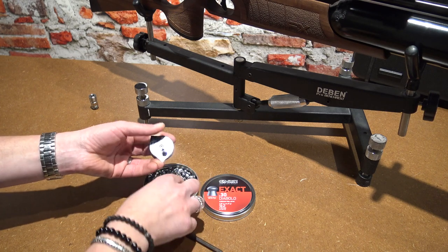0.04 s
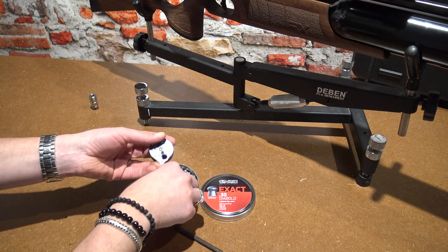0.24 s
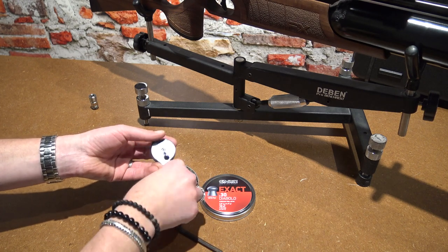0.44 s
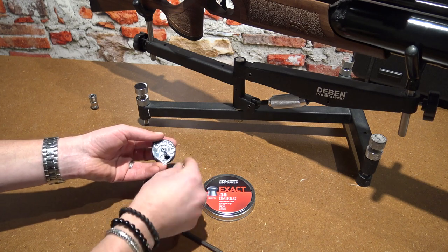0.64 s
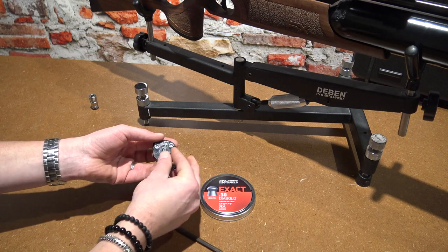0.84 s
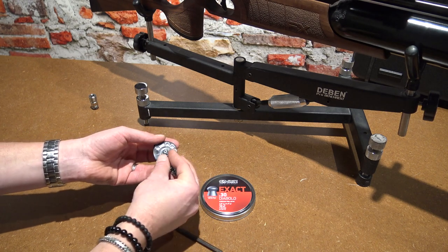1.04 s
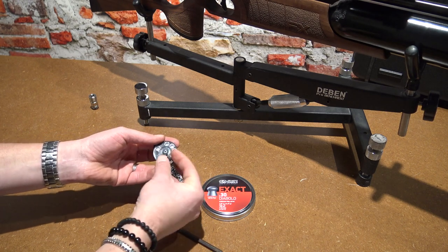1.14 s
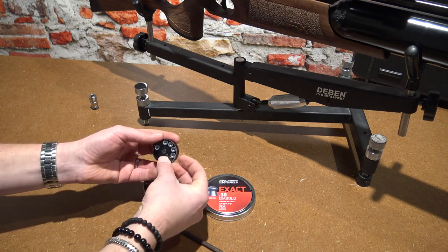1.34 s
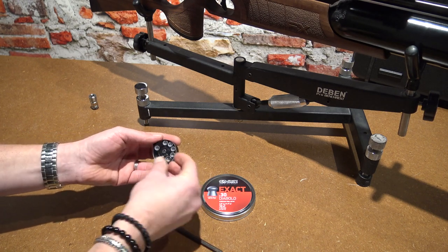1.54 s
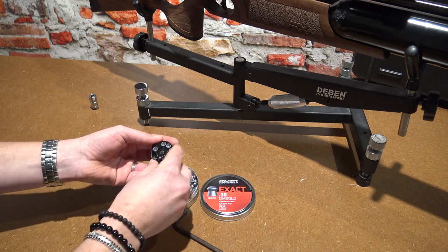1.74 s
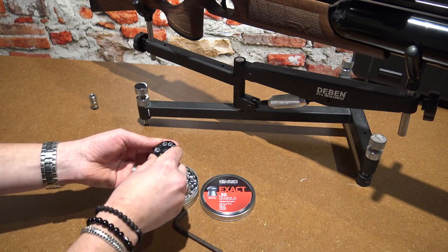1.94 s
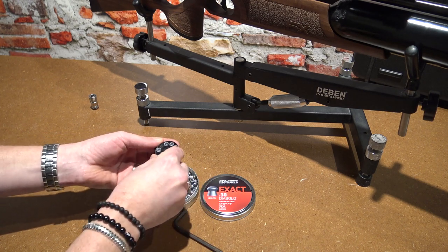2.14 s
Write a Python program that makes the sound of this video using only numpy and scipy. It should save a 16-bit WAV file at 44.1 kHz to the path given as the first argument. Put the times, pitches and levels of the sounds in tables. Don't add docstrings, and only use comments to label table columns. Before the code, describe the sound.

Small lead pellets are stirred in a thin tin, a few dropping back with bright ringing bounces, then pressed into a magazine with short clicks and faint rubs; quiet room, faint hum, close microphone.

```python
import sys
import numpy as np
from scipy import signal
from scipy.fft import rfft, irfft
from scipy.io import wavfile
from scipy.ndimage import uniform_filter1d

SR = 44100
rng = np.random.default_rng(int(sys.argv[2]) if len(sys.argv) > 2 else 0)


def gain_from_db(level_db):
    decades = np.asarray(level_db, float) / 20
    return 10 ** decades


def transcribe(u):
    v = np.clip(np.atleast_2d(u).T, -1, 1)
    q = np.round(v * 32767).astype(np.int16)
    wavfile.write(sys.argv[1], SR, q)


N = 97020


def read(points, hz):
    f, value = np.transpose(points)
    return np.interp(np.log(hz + 1), np.log(f + 1), value)


def evened(x):
    return x / np.sqrt(np.mean(x ** 2) + 1e-20)


def peaked(x):
    return x / abs(x).max()


def add(mix, s, sound):
    part = mix[max(round(s * SR), 0):][:len(sound)]
    part += sound[:len(part)]


def coloured(x, points):
    gain = gain_from_db(read(points, np.fft.rfftfreq(len(x), 1 / SR)))
    return evened(irfft(rfft(x) * gain, len(x)))


def ring(hz, db, t60, size=2000):
    t = np.arange(size) / SR
    return gain_from_db(db - 60 * t / t60) * np.sin(2 * np.pi * hz * t)


MODE_SPREAD_DB, MODE_DETUNE = 2.5, 0.02


def modes(table, draw):
    total = 0
    for (hz, db, t60), (detune, spread, sign) in zip(table, draw):
        total = total + np.sign(sign) * ring(hz * (1 + MODE_DETUNE * detune), db + MODE_SPREAD_DB * spread, t60)
    return total


def burst(noise, band_hz, db, t60):
    band = signal.butter(2, band_hz, "band", fs=SR, output="sos")
    puff = evened(signal.sosfilt(band, noise))
    return gain_from_db(db - 60 * np.arange(len(noise)) / SR / t60) * puff


def tail(t60, points):
    hz, t, z = signal.stft(coloured(rng.standard_normal(SR), points), SR, nperseg=256)
    out = signal.istft(z * gain_from_db(-60 * t / read(t60, hz)[:, None]), SR, nperseg=256)[1]
    rise_s = 0.00076
    out = out * np.minimum(np.arange(len(out)) / (rise_s * SR), 1)
    return out / np.linalg.norm(out)


# (time [s], knock level [dB], knock pitch [Hz], tick level re knock [dB])
STIRS = [(.0905, -28.5, 1830, -7), (.0954, -27, 2770, -14), (.1037, -28.5, 2660, -6.5),
         (.1134, -47, 3430, -6.5), (.1194, -31, 1810, -17), (.199, -20.5, 3000, -8),
         (.2076, -19.5, 1510, -8), (.2098, -17.5, 1520, -19), (.2135, -25, 1500, -11),
         (.2172, -20.5, 3200, -4.5), (.2226, -17, 2600, -9), (.2245, -20, 2900, -4),
         (.2268, -22, 2600, -16), (.2313, -16.5, 2200, -10), (.2384, -21, 2510, -23),
         (.2484, -36, 2500, -23), (.2522, -21.5, 2240, -8), (.2535, -12.5, 2150, -10),
         (.259, -18, 1850, -18), (.27, -31, 2360, -10), (.275, -19, 2140, -22), (.2778, -8, 2950, -3.5),
         (.2792, -12.5, 2780, -2), (.2835, -18, 1700, -4), (.2884, -14, 1890, -17), (.2959, -13, 2200, -16),
         (.313, -22, 1500, -15), (.3218, -12, 2276, -13), (.3245, -18, 2930, -16),
         (.3364, -13.5, 2810, -21), (.344, -31, 2300, -13), (.3584, -22, 2750, -18)]
# (time [s], knock level [dB], knock pitch [Hz], tick level re knock [dB])
DROPS = [(.3861, -1.5, 2800, -17), (.3885, -8, 3300, -20), (.4077, -6, 3450, -10), (.4097, -9, 2300, -14),
         (.4178, -11, 3450, -20), (.4305, -14, 3500, -22), (.4526, -2, 3130, -18), (.4585, -13, 3600, -22),
         (.4743, -16, 3470, -24), (.4873, -5, 3120, -19), (.4897, -11, 3000, -19), (.497, -9, 3200, -12),
         (.5158, -10, 3160, -23), (.5339, -11, 3140, -21), (.5479, -15, 3170, -25), (.5586, -19, 2900, -30),
         (.574, -21, 3200, -32), (.601, -25, 3100, -35)]
# (frequency [Hz], level re knock [dB], t60 [s])
TIN_FLOOR = [(950, -8, 0.0039), (1550, -11, 0.033), (2200, -0.5, 0.0065), (3000, -6, 0.02),
             (3600, -14, 0.0089), (4540, -28, 0.012)]
# (frequency [Hz], level re knock [dB], t60 [s])
LANDING_FLOOR = [(960, -16, 0.0074), (1500, -13.5, 0.021), (2250, -6.5, 0.0068), (2767, -4, 0.0098),
                 (3522, -8.5, 0.016), (4380, -13, 0.0052)]
# (frequency [Hz], level [dB], t60 [s])
TABLE_TOP = [(224, 5, 0.022), (472, 6, 0.025), (674, -2, 0.041)]
TIN_RISE_S = 0.0002
KNOCK_DB, KNOCK_T60_S = -0.5, 0.013
STRIKE_DB, STRIKE_T60_S = 2.5, 0.0018
SHIVER_BAND_HZ, SHIVER_DB, SHIVER_T60_S = (1230, 3730), -12.5, 0.035
TICK_HZ, TICK_BAND_HZ, TICK_T60_S = 8460, (6000, 15500), 0.011


def tin(table, floor, table_db):
    out, t = np.zeros(N), np.arange(2000) / SR
    rise = 1 - np.exp(-t / TIN_RISE_S)
    for s, db, hz, tick_db in table:
        draw = rng.standard_normal((len(floor), 3))
        noise = rng.standard_normal(2000)
        knock = ring(hz, KNOCK_DB, KNOCK_T60_S) + ring(hz, STRIKE_DB, STRIKE_T60_S)
        knock = knock + modes(floor, draw)
        knock = knock + burst(noise[::-1], SHIVER_BAND_HZ, SHIVER_DB, SHIVER_T60_S)
        tick = burst(noise, TICK_BAND_HZ, 0, TICK_T60_S)
        tick = tick + ring(TICK_HZ * (1 + 0.063 * draw[0, 0]), 0, TICK_T60_S)
        table_top = gain_from_db(table_db) * modes(TABLE_TOP, draw)
        hit = peaked(knock * rise) + rise * (gain_from_db(tick_db) * peaked(tick) + table_top)
        add(out, s, gain_from_db(db) * hit)
    return out


def slam():
    out = np.zeros(N)
    add(out, 0.3862, burst(rng.standard_normal(6000), band_hz=(300, 2600), db=-24, t60=0.15))
    return out


# (frequency [Hz], density level [dB per Hz])
WALL = [(250, -17), (800, -3.5), (1500, -2.5), (2600, -0.5), (3500, 2.5), (4300, -4.5), (5200, -13.5),
        (12000, -36)]
# (frequency [Hz], t60 [s])
WALL_T60 = [(200, 0.24), (1000, 0.59), (3200, 0.66), (5500, 0.58), (10000, 0.27)]


def wall_hum(drive):
    return signal.fftconvolve(abs(drive) * rng.choice([-1., 1.], N), tail(WALL_T60, WALL))[:N]


# (frequency [Hz], level [dB], t60 [s])
RIM = [(8280, -5, .3), (8400, -14, .15), (9340, 0, .35), (14890, -2, .14), (14550, -16, .1)]
# (time [s], level [dB], damped after [s])
RIM_HITS = [
    (.386, -22.5, 0.048),
    (.453, -41.5, 0.033),
    (.488, -52, 0.042),
]
RIM_RISE_S, RIM_DAMP_S = 0.007, 0.0061


def rim():
    out, t = np.zeros(N), np.arange(6000) / SR
    lines = sum(ring(*row, size=6000) for row in RIM) * (1 - np.exp(-t / RIM_RISE_S))
    for s, db, held in RIM_HITS:
        touch = 0.08 + 1.13 / (1 + np.exp((t - held) / RIM_DAMP_S))
        add(out, s, gain_from_db(db) * lines * touch)
    return out


GRAINS_PER_S, GRAIN_DB, GRAIN_S = 400, 2, 0.003


def strokes(table):
    sizes_db = GRAIN_DB * np.minimum(rng.exponential(1, N), 4)
    hits = gain_from_db(sizes_db) * (rng.random(N) < GRAINS_PER_S / SR)
    level, t = np.zeros(N), np.arange(N) / SR
    bursts = evened(signal.oaconvolve(hits, np.exp(-t[:800] / GRAIN_S))[:N])
    for s, length, db in table:
        level += gain_from_db(db) * np.sin(np.pi * np.clip((t - s) / length, 0, 1) ** 0.7) ** 2
    return level, (bursts + 1) * rng.standard_normal(N)


# (start [s], length [s], level [dB])
SLIDES = [
    (0, 0.032, -43.5),
    (.088, 0.069, -46.5),
    (.197, 0.27, -39.5),
    (.388, 0.07, -25),
]
# (frequency [Hz], level [dB])
SLIDE = [(300, -8), (1200, -6.5), (1700, -16), (3000, -5.5), (4500, -15), (5500, -30), (8800, -14.5),
         (16000, -35)]


def slides():
    level, grains = strokes(SLIDES)
    return level * coloured(grains, SLIDE)


# (time [s], metal level [dB], plastic knock level [dB], knock pitch [Hz], strongest metal mode [Hz])
SEATS = [(.9176, -19.5, -13.5, 2020, 4560), (.9218, -36, -23, 2030, 3420), (.9241, -23, -37, 1920, 4750),
         (.9285, -17.5, -14.5, 1670, 4800), (1.2075, -43, -38, 3230, 3230), (1.218, -28, -15, 1795, 4470),
         (1.2203, -13.5, -16, 1990, 6360), (1.2285, -28, -23.5, 1980, 3300), (1.234, -23, -28, 1930, 6200),
         (1.2378, -22, -24, 1950, 4250), (1.2392, -42, -36, 3220, 4000), (1.242, -11.5, -12.5, 2250, 4710),
         (1.2432, -12.5, -9, 3050, 6250), (1.2447, -15, -15.5, 3300, 4040)]
# (frequency [Hz], level [dB], t60 [s])
PRESSED = [(3300, -5, 0.005), (4200, -9, 0.0045), (6275, -12, .005), (7500, -13, 0.004), (9900, -11, 0.004),
           (12400, -12, .004)]
# (time [s], metal level [dB], plastic knock level [dB], knock pitch [Hz])
CLICKS = [(.0292, -24.5, -30, 3720), (.052, -53, -33, 1970), (1.383, -50, -60, 3120),
          (1.4063, -41, -25, 3130), (1.4125, -35, -30.5, 1820), (1.6225, -24, -27, 3410),
          (1.652, -29.5, -31.5, 3570), (1.6571, -42, -31, 2930), (1.6775, -60, -35, 3000),
          (1.7408, -23.5, -51, 4500), (1.7655, -57, -31.5, 3600), (1.7806, -26.5, -26.5, 1560),
          (1.787, -38, -26, 1790), (1.7937, -52, -33, 3860), (1.9225, -23.5, -42, 4800),
          (1.955, -55, -32, 3100), (2.0155, -36.5, -29.5, 3320), (2.040, -53, -32.5, 3600)]
# (frequency [Hz], level [dB], t60 [s])
MAGAZINE = [(4570, -6, 0.0021), (6380, -3.5, 0.0047), (9450, -19.5, 0.0049), (12020, -25, 0.0032),
            (12220, -14.5, 0.0062), (15450, -19, 0.0039)]
CLICK_RISE_S = 0.0008
LEAD_DB, LEAD_T60_S = 1, 0.0052
CRACK_BAND_HZ, CRACK_DB, CRACK_T60_S = (3500, 13500), -8.5, 0.005
PLASTIC_DB, PLASTIC_T60_S = 4.2, 0.0062
THUMP_HZ, THUMP_DB, THUMP_T60_S = 805, -8.5, 0.004
SHELL_DB, SHELL_T60_S = -30, 0.025
BODY_BAND_HZ, BODY_DB, BODY_T60_S = (1380, 5170), -5, 0.011


def magazine(table, body):
    out, draws = np.zeros(N), rng.standard_normal((len(table), len(body), 3))
    hiss, t = rng.standard_normal((len(table), 2000)), np.arange(2000) / SR
    rise = 1 - np.exp(-(t / CLICK_RISE_S) ** 2)
    for (s, db, knock_db, hz, *lead_hz), draw, noise in zip(table, draws, hiss):
        metal = modes(body, draw) + sum(ring(f, LEAD_DB, LEAD_T60_S) for f in lead_hz)
        metal = metal + burst(noise, CRACK_BAND_HZ, CRACK_DB, CRACK_T60_S)
        knock = ring(hz, PLASTIC_DB, PLASTIC_T60_S) + ring(THUMP_HZ, THUMP_DB, THUMP_T60_S)
        knock = knock + ring(hz, SHELL_DB, SHELL_T60_S) + ring(hz * 1.3, SHELL_DB, SHELL_T60_S)
        knock = knock + burst(noise[::-1], BODY_BAND_HZ, BODY_DB, BODY_T60_S)
        add(out, s, gain_from_db(db) * peaked(rise * metal) + gain_from_db(knock_db) * rise * knock)
    return out


# (frequency [Hz], width [Hz], level [dB])
RUBS = [
    (1.29, 0.1, -60),
    (1.622, .07, -61),
    (1.742, 0.097, -63),
    (1.87, 0.18, -51),
    (2.012, 0.027, -60),
]
RUB = [(3430, 230, 10), (4800, 440, 2), (6800, 1000, 4), (9300, 1150, 1), (11400, 510, -10),
       (12400, 950, 1), (14200, 1400, -10)]
DRAGS = [
    (.92, .013, -38),
    (.931, .03, -42),
    (1.78, .02, -55),
]
DRAG = [(1900, 600, 0), (3100, 700, -5), (4700, 600, -9), (6800, 900, -21)]
SHIVERS = [
    (1.248, .1, -50),
    (.95, .07, -60),
]
SHIVER = [(1600, 400, -7), (3050, 300, 0), (3800, 600, -4), (4840, 400, -9), (6090, 400, -14),
          (12400, 400, -18)]


def rubs(table, body):
    level, grains = strokes(table)
    hz = np.fft.rfftfreq(N, 1 / SR)
    colour = sum(gain_from_db(db) / (1 + 1j * (hz - f) / w) ** 2 for f, w, db in body)
    return level * evened(irfft(rfft(grains) * colour, N))


# (start [s], length [s], level [dB])
SQUEAKS = [
    (1.9, .125, -56),
]
SQUEAK_SINK_S, SQUEAK_SINK_HZ, SQUEAK_WIDTH_HZ = (1.9, 1.945), (7700, 6250), 220


def squeak():
    level, grains = strokes(SQUEAKS)
    hz = np.interp(np.arange(N) / SR, SQUEAK_SINK_S, SQUEAK_SINK_HZ)
    r = np.exp(-np.pi * SQUEAK_WIDTH_HZ / SR)
    slow = signal.lfilter([1 - r], [1, -r], grains)
    slow = signal.lfilter([1 - r], [1, -r], slow)
    return level * evened(slow * np.cos(2 * np.pi * np.cumsum(hz) / SR))


def room(near):
    t60 = [(200, 0.077), (5000, 0.49), (15000, 0.05)]  # (frequency [Hz], t60 [s])
    spectrum = [(100, -6.5), (16000, -32.5)]  # (frequency [Hz], level [dB])
    return signal.fftconvolve(near, tail(t60, spectrum))[:N]


# (frequency [Hz], level [dB])
AIR = [(15, -44.5), (25, -4.5), (285, -1), (734, -5.5), (1230, -6), (1440, -7), (2350, -10.5), (2990, -9.5),
       (16000, -35.5)]
# (frequency [Hz], level [dB rms])
MAINS = [(50, -64.5), (100, -59.5), (200, -60), (300, -58)]
AIR_DB = -51
THUD_S, THUD_HZ, THUD_DB, THUD_WIDTH_S = 1.525, 43, -44, 0.045


def background():
    t = np.arange(N) / SR
    waver = evened(uniform_filter1d(rng.standard_normal((len(MAINS), N)), 3000, axis=1))
    hum = 0
    for (hz, db), w in zip(MAINS, waver):
        hum = hum + gain_from_db(db - 2 + 1.14 * w) * np.sin(2 * np.pi * hz * t + 0.17 * w)
    swell = np.exp(-((t - THUD_S) / THUD_WIDTH_S) ** 2)
    thud = gain_from_db(THUD_DB) * swell * np.sin(2 * np.pi * THUD_HZ * t)
    return gain_from_db(AIR_DB) * coloured(rng.standard_normal(N), AIR) + hum + thud


STIR_HUM_DB, WALL_DB, ROOM_DB, RUMBLE_HZ = -10.5, -6, -17.5, 167


def scene():
    stirs = tin(STIRS, TIN_FLOOR, table_db=-30.5)
    drops = tin(DROPS, LANDING_FLOOR, table_db=-27.5) + slam()
    near = stirs + drops + slides() + rim()
    wall = wall_hum(gain_from_db(STIR_HUM_DB) * stirs + drops)
    near = near + magazine(SEATS, PRESSED) + magazine(CLICKS, MAGAZINE)
    near = near + rubs(RUBS, RUB) + rubs(DRAGS, DRAG) + rubs(SHIVERS, SHIVER) + squeak()
    events = near + gain_from_db(WALL_DB) * wall + gain_from_db(ROOM_DB) * room(near)
    rumble_cut = signal.butter(3, RUMBLE_HZ, "high", fs=SR, output="sos")
    return (signal.sosfilt(rumble_cut, events) + background())[None]


def top_cut(x):
    return signal.sosfilt(signal.butter(12, 16640, fs=SR, output="sos"), x)


LIMIT, EDGE_HZ = 1, 15900


def record(dry):
    soft = LIMIT * np.tanh(dry / LIMIT)
    lowpass = signal.firwin(255, EDGE_HZ, window=("kaiser", 7), fs=SR)
    mix = signal.oaconvolve(soft, lowpass[None], "same")
    return top_cut(mix)


dry = scene()
out = record(dry)
transcribe(out)
```